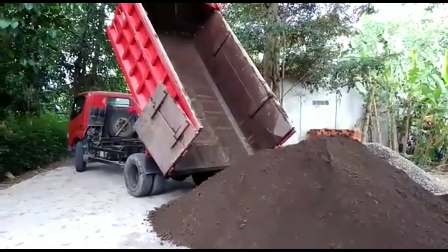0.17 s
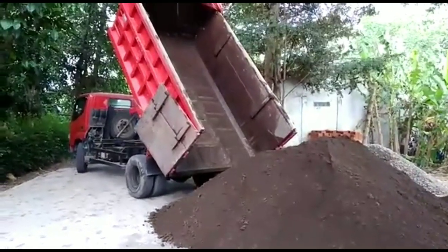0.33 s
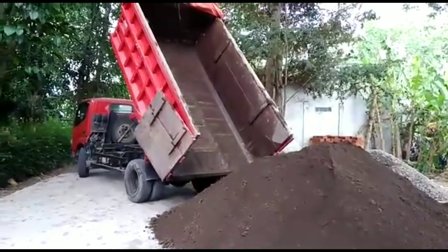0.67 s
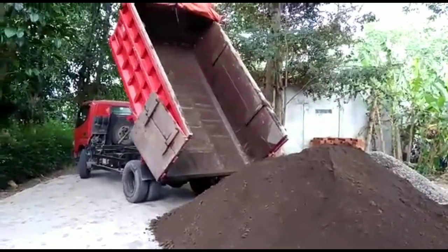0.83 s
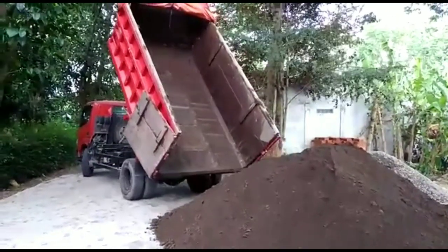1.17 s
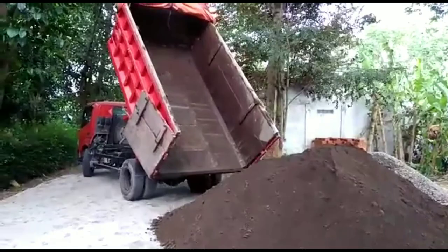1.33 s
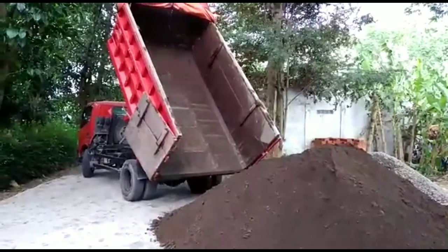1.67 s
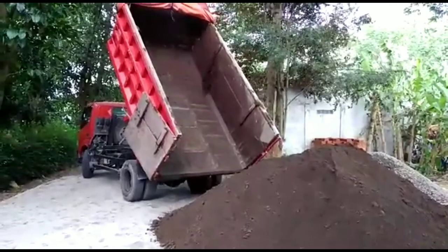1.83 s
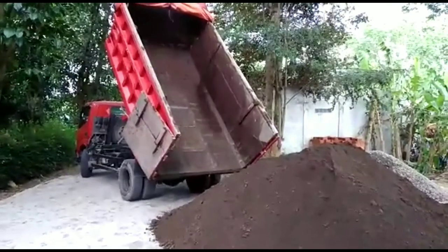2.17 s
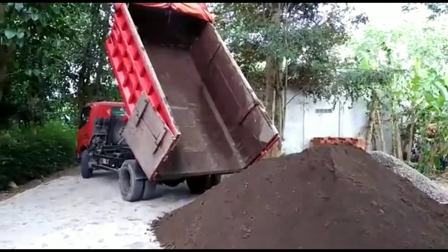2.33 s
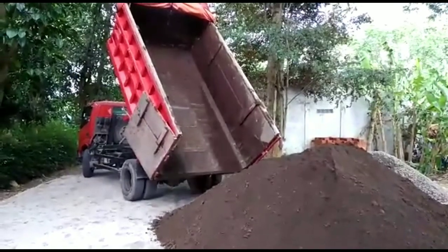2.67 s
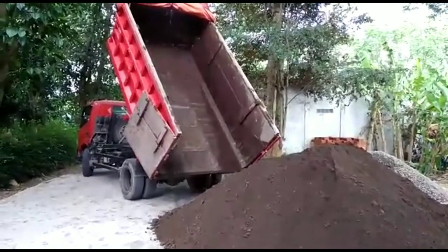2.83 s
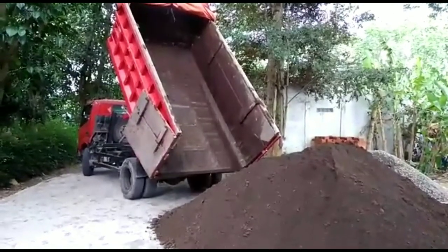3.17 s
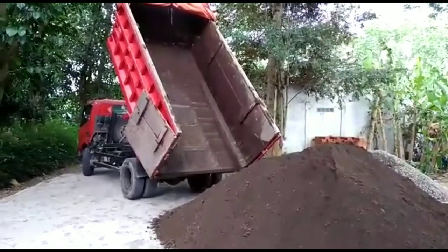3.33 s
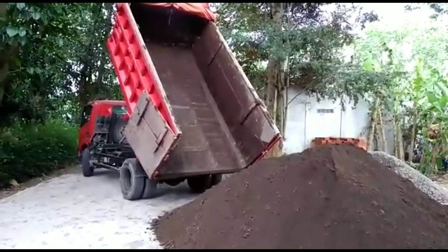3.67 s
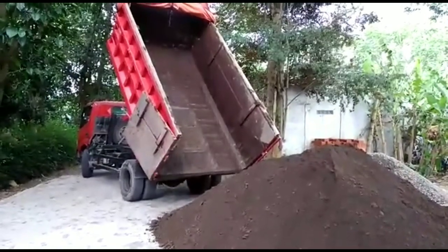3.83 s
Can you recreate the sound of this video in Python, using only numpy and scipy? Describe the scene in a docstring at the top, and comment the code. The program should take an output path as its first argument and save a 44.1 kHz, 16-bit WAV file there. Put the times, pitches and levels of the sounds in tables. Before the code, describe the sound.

In an open yard, a diesel idles with uneven puffs and soft scuffs; small clinks lead to a burst of tailgate bangs and sliding grit, then a few clinks and low wind thumps on the microphone.

```python
"""A tipper truck with its bed raised creeps away from a heap of sand in a yard, over a soft hiss.
From the start its diesel thuds at idle, as uneven puffs ringing an exhaust pipe; the chassis scuffs, wind puffs.
The latch clinks, sand hisses off the bed, and the loose tailgate bangs, judders against the bed and bangs again,
as noise bursts and ringing modes, while the bed thuds and groans. Last clinks follow, then hard puffs of wind
rumble and thump on the microphone."""
import sys
import numpy as np
from scipy import signal
from scipy.fft import rfft, irfft
from scipy.io import wavfile
from scipy.ndimage import uniform_filter1d

SR = 44100
rng = np.random.default_rng(int(sys.argv[2]) if len(sys.argv) > 2 else 0)


def bounce(signal):
    """Save signal as a 16-bit WAV file at the path given by the first command-line argument."""
    frames = np.transpose(np.atleast_2d(signal))
    limited = np.clip(frames, -1, 1)
    pcm = np.round(limited * 32767).astype(np.int16)
    wavfile.write(sys.argv[1], SR, pcm)


N = 176400
TIME = np.arange(N) / SR

# All colour tables below set noise spectra. Each row: frequency in Hz, relative density in dB per Hz.

# Blows of the tailgate. Each row: start in seconds, steel clank in dB, bed panel boom in dB,
# contact length in seconds.
TAILGATE_BLOWS = [(2.1647, -17, -26, 0.0027), (2.276, -34, -39, .004), (2.301, -29, -28.5, 0.0056),
                  (2.333, -36.5, -30, .025), (2.372, -34, -49, 0.0063), (2.430, -31.5, -43, 0.0088),
                  (2.459, -35, -37.5, 0.012), (2.551, -29, -44.5, .008), (2.579, -27.5, -37.5, 0.0053),
                  (2.5922, -16, -58, .005), (2.609, -27, -34, 0.0065), (2.717, -40, -51.5, .004),
                  (2.824, -38, -44, 0.0027)]
# Colours of the gate's clank and of the bed's boom.
CLANK_COLOUR = [(300, -42), (900, -7), (1500, -5.5), (2000, 0), (3000, 2.5), (4400, 6), (5300, -0.5),
                (6100, 3.5), (6900, 2.5), (7700, -5), (8800, -8), (9300, -18.5), (11000, -19), (14000, -59)]
BOOM_COLOUR = [(120, -18), (220, -2), (300, 6), (380, -7.5), (560, 6), (760, -3.5), (1000, -0.5),
               (1500, -4.5), (2500, -3), (5000, -32)]
# Ringing of the gate and of the bed panels. Each row: frequency in Hz, relative level in dB, t60 in seconds.
GATE_MODES = [(1614, -6, .3), (1850, -4, .22), (2161, -3, .28), (2468, -2, .26), (3087, -2, .28),
              (3293, -3, .28), (3862, -4, .24), (4250, 0, .2), (4515, -2, .25), (4716, 1, .25),
              (5773, -1, .28), (6115, -5, .22), (6545, -6, .22), (6960, -3, .2)]
PANEL_MODES = [(302, 0, .28), (491, -1, .55), (530, -7, .6), (589, -3, .42), (658, -4, .4), (790, -9, .4),
               (932, -3, .27), (1066, -8, .3), (1150, -6, .2), (1384, -6, .3)]
GATE_RING_DB, PANEL_RING_DB = -15, -6.5
CLANK_T60_S, BOOM_T60_S, CRACK_T60_S = .2, .29, .052
CRACK_DB = .5  # crack over clank at the hardest blow
CHATTER_DB, CHATTER_PER_S = 2.2, 260
YARD_DB, YARD_T60_S = -10.5, .51  # tail of the yard, relative to the hit

# Heavy thuds of the bed on its frame. Each row: start in seconds, level in dB, contact length in seconds.
BED_THUDS = [(2.302, -33.5, 0.013), (2.34, -37, 0.034), (2.42, -37.5, 0.014)]
THUD_COLOUR = [(150, -27), (250, -1), (305, 3), (360, -6), (420, 5), (520, -4), (900, -29)]
THUD_T60_S = .14

# The bed groans as the load shifts. Each row: time in seconds, pitch in Hz, level in dB.
BED_GROAN = [(2.28, 480, -62), (2.379, 500, -40), (2.451, 540, -29.5), (2.519, 565, -37.5),
             (2.621, 625, -41), (2.72, 610, -46), (2.821, 535, -40), (2.92, 510, -67), (3.3, 520, -72)]
GROAN_TURNS_PER_S = 190

# Light clinks of latch and chain. Each row: start in seconds, level in dB, leading pitch in Hz.
LATCH_CLINKS = [(1.5685, -38.5, 6930), (1.598, -30.5, 5940), (1.607, -30.5, 3426), (1.665, -34.5, 5850),
                (2.0124, -43.5, 3720), (2.0498, -40.5, 6230), (2.938, -38, 4150), (2.958, -44, 3900),
                (3.0516, -42.5, 7280)]
CLINK_COLOUR = [(800, -14), (2000, -10.5), (2800, -2.5), (3500, 3.5), (4300, 1.5), (5200, 1.5), (5900, 3),
                (7000, 3.5), (8200, -4), (10000, -9), (14000, -21)]
CLINK_T60_S, CLINK_YARD_DB = .11, -5.5
CLINK_RING_DB, CLINK_RING_T60_S = 3, .09
# The latch's own ringing. Each row: frequency in Hz, relative level in dB, t60 in seconds.
LATCH_MODES = [(3295, -14, .2), (3490, -8, .2), (4850, -16, .15), (5826, -7, .16), (5960, -10, .16),
               (6850, -11, .16)]
LATCH_RING_DB = -9

# Sand and grit sliding on the steel. Each row: time in seconds, level in dB.
SAND_LEVEL = [(0, -65), (1.93, -55), (2.07, -39.5), (2.14, -46), (2.3, -35), (2.47, -36), (2.65, -38),
              (2.8, -40.5), (3.08, -46), (3.25, -52.5), (4, -71)]
SAND_COLOUR = [(200, -19), (400, -3), (560, 12), (850, 6), (1600, 0.5), (3800, -1), (5300, -5.5),
               (7200, 3.5), (9500, -6.5), (14000, -19.5)]

FIRST_CYCLE_S, CYCLE_S, SLOWING_S_PER_CYCLE = .0943, .1002, .00002
# Uneven firings of one engine cycle. Each row: delay in seconds, level in dB, pulse cut-off in Hz.
FIRINGS = [(-.0275, 4, 100), (0, 2, 505), (.021, 1, 400), (0.047, -12.5, 110)]
FIRING_ROUGH_DB = .8
# Echoes of the exhaust from ground, chassis and walls. Each row: delay in seconds, level in dB.
EXHAUST_ECHOES = [(.0054, -6.5), (0.011, -19.5), (0.0178, -8), (0.034, -14.5)]
# Exhaust pipe resonances. Each row: frequency in Hz, level in dB before division by frequency, t60 in seconds.
PIPE_MODES = [(49, -9.5, 0.43), (120, -9, 0.12), (207, -3.5, 0.08), (253.3, -0.5, 0.095), (296, -15, 0.043),
              (393, -7, 0.064), (484, -1, 0.09), (590, -15, 0.17), (740, -22, 0.093), (866, -53, 0.059)]
DIRECT_PUFF_DB = -14.5  # relative to the pipe
# Exhaust loudness at the microphone. Each row: time in seconds, level in dB.
EXHAUST_LEVEL = [(0, -41.5), (.8, -43.5), (1.6, -42.5), (2.4, -45), (3.2, -44), (3.6, -49), (4, -44)]
# Mechanical clatter of the engine: its colour, then its loudness.
CLATTER_COLOUR = [(150, 20), (400, 1), (900, 2), (1300, -2.5), (1700, -9), (2100, -12), (2500, -4.5),
                  (3100, -5.5), (3900, -12), (6000, -13.5), (14000, -30)]
# Each row: time in seconds, level in dB.
CLATTER_LEVEL = [(0, -43.5), (.7, -43), (.9, -39.5), (1.1, -42.5), (1.9, -46.5), (3, -52), (3.5, -49.5),
                 (4, -47)]
CLATTER_DELAY_S, CLATTER_SWING_DB = .049, 3

# Soft scuffs of the creeping truck. Each row: start in seconds, level in dB, length in seconds.
CHASSIS_SCUFFS = [(.04, -52, .03), (.15, -49.5, 0.017), (.36, -51, 0.022), (.46, -51, .02),
                  (.55, -52, 0.046), (.65, -48, 0.011), (.70, -50, 0.0095), (.845, -44.5, 0.025),
                  (1.448, -50.5, 0.031), (1.548, -44, 0.016), (1.951, -48.5, 0.024)]
SCUFF_COLOUR = [(400, -16), (800, 6.5), (1200, 5), (1700, -12), (2200, -10), (2700, 4.5), (3200, 3.5),
                (3800, -8), (7000, -20), (14000, -16)]
SCUFF_T60_S = .23

# Hard buffets of wind on the microphone. Each row: start in seconds, level in dB, length in seconds.
WIND_BUFFETS = [(3.413, -40, 0.015), (3.823, -29, 0.0255)]
BUFFET_COLOUR = [(50, -2), (100, 3), (200, -3), (320, -4), (450, -20), (1500, -51)]
BUFFET_T60_S = .044
# Wind on the microphone. Each row: time in seconds, level in dB.
WIND_LEVEL = [(0, -43), (.68, -44), (.75, -30.5), (.82, -40.5), (.97, -30), (1.15, -45), (1.7, -48.5),
              (1.78, -38), (1.9, -43.5), (2.7, -55), (2.86, -32.5), (3.2, -42), (3.3, -43), (3.43, -25),
              (3.53, -46), (3.59, -32), (3.79, -35.5), (3.83, -25.5), (3.88, -40), (3.94, -28.5),
              (4, -43.5)]
RUMBLE_COLOUR = [(20, -27), (35, 1), (50, -9), (70, 2), (110, -6.5), (160, -14), (280, -23), (450, -49),
                 (1500, -76)]
WIND_LUMP_DB = 2.4
# Hiss of the yard.
HISS_COLOUR = [(100, 19), (500, 5), (1500, -8.5), (4000, -8), (5600, -7.5), (6900, 4), (7600, 2.5),
               (8600, -2.5), (10500, -6.5), (12500, -13), (14200, -12.5)]
HISS_DB, HISS_FLUTTER_DB = -47.5, .7

RIPPLE_DB, RIPPLE_HZ = 3.0, 45  # depth and spacing of the steel's spectral peaks
CUTOFF_HZ = 14450


def from_db(db):
    """Decibels to gain."""
    return 10 ** (np.asarray(db) / 20)


def rms_one(x):
    """Scale to unit rms."""
    return x / np.sqrt(np.mean(x ** 2) + 1e-20)


def level(rows):
    """Gain over time, drawn straight in dB between the rows."""
    return from_db(np.interp(TIME, *np.transpose(rows)))


def noise(colour):
    """Unit noise shaped to a colour, falling away below its lowest row."""
    hz, db = np.transpose(colour)
    bins = np.maximum(np.arange(N // 2 + 1) * SR / N, 1)
    gain = from_db(np.interp(np.log(bins), np.log(hz), db))
    gain = gain * np.minimum(bins / hz[0], 1) ** 2
    return rms_one(irfft(rfft(rng.standard_normal(N)) * gain, N))


def steel(colour):
    """Coloured noise with the close, narrow peaks of a large steel structure."""
    bins = np.arange(N // 2 + 1) * SR / N
    peaks = np.interp(bins / RIPPLE_HZ, np.arange(N), rng.standard_normal(N))
    return rms_one(irfft(rfft(noise(colour)) * from_db(RIPPLE_DB * peaks), N))


def flutter(rate):
    """Random wander of unit rms, with a new target `rate` times a second."""
    return rms_one(np.interp(TIME * rate, np.arange(N), rng.standard_normal(N)))


def ring(clicks, hz, t60):
    """A two-pole resonator: a unit click sets a sine of height 1 ringing and dying."""
    radius = from_db(-60 / (t60 * SR))
    angle = 2 * np.pi * hz / SR
    feedback = [1, -2 * radius * np.cos(angle), radius * radius]
    return signal.lfilter([0, np.sin(angle)], feedback, clicks + 1e-18)


def clicks_at(times, sizes):
    """A track of single clicks."""
    places = np.clip(np.asarray(times) * SR, 0, N).astype(int)
    return np.bincount(places, sizes, N + 1)[:N]


def dying(start, hold, t60):
    """Envelope: sudden start, short hold, exponential fall."""
    return (TIME >= start) * from_db(-60 * np.maximum(TIME - start - hold, 0) / t60)


def wash(hits, colour, t60, yard_db):
    """Countless close steel modes, as noise, die after each hit and leave the yard's tail."""
    power = 0
    for start, db, hold in hits:
        near = dying(start, hold, t60)
        yard = from_db(yard_db) * dying(start, hold, YARD_T60_S)
        power = power + from_db(db) ** 2 * (near ** 2 + yard ** 2)
    return np.sqrt(power) * steel(colour)


def struck(times, dbs, modes, scatter_db=2):
    """Each blow rings every mode with a strength of its own, starting within one period."""
    total = 0
    for hz, db, t60 in modes:
        starts = times + rng.random(len(times)) / hz
        sizes = from_db(dbs + db + scatter_db * rng.standard_normal(len(times)))
        total = total + ring(clicks_at(starts, sizes), hz, t60)
    return total


def tailgate():
    """The gate clanks against the bed, whose panels boom and ring on; hard blows also crack."""
    times, clank_db, boom_db, contact = np.transpose(TAILGATE_BLOWS)
    chatter = rms_one(from_db(CHATTER_DB * flutter(CHATTER_PER_S)))
    clank = chatter * wash(zip(times, clank_db, contact), CLANK_COLOUR, CLANK_T60_S, YARD_DB)
    # the crack falls off twice as fast in dB as the clank, so soft blows barely have one
    crack_db = CRACK_DB + 2 * clank_db - clank_db.max()
    crack_shape = sum(from_db(db) * dying(start, hold, CRACK_T60_S)
                      for start, db, hold in zip(times, crack_db, contact))
    crack = noise(CLANK_COLOUR) * crack_shape
    boom = wash(zip(times, boom_db, contact), BOOM_COLOUR, BOOM_T60_S, YARD_DB)
    gate_ring = struck(times, clank_db + GATE_RING_DB, GATE_MODES)
    panel_ring = struck(times, boom_db + PANEL_RING_DB, PANEL_MODES)
    return crack + clank + boom + gate_ring + panel_ring


def thuds():
    """The bed drops its weight onto the frame with a low, hollow burst of steel noise."""
    return wash(BED_THUDS, THUD_COLOUR, THUD_T60_S, YARD_DB)


def groan():
    """A rough panel resonance that rises and sinks: a gliding tone blurred by random wander."""
    times, hz, db = np.transpose(BED_GROAN)
    phase = 2 * np.pi * np.cumsum(np.interp(TIME, times, hz)) / SR
    rough = flutter(GROAN_TURNS_PER_S) * np.cos(phase) + flutter(GROAN_TURNS_PER_S) * np.sin(phase)
    return from_db(np.interp(TIME, times, db)) * rough


def latch():
    """Small steel parts clink, each with one brief leading note over the ring of the latch."""
    times, dbs, _ = np.transpose(LATCH_CLINKS)
    notes = sum(ring(clicks_at([start], [from_db(db + CLINK_RING_DB)]), hz, CLINK_RING_T60_S)
                for start, db, hz in LATCH_CLINKS)
    latch_ring = struck(times, dbs + LATCH_RING_DB, LATCH_MODES)
    hits = [(start, db, 0) for start, db, _ in LATCH_CLINKS]
    return notes + latch_ring + wash(hits, CLINK_COLOUR, CLINK_T60_S, CLINK_YARD_DB)


def sand():
    """Shaken loose, grit slides down the hollow bed: noise coloured by the steel."""
    return level(SAND_LEVEL) * steel(SAND_COLOUR)


def exhaust(cycles):
    """Uneven firings puff, echo and ring the exhaust pipe."""
    puffs = 0
    for delay, db, cut_hz in FIRINGS:
        times = cycles + delay
        sizes = from_db(db + FIRING_ROUGH_DB * rng.standard_normal(len(cycles))) * (times > 0)
        soften = signal.butter(2, cut_hz, fs=SR, output="sos")
        puffs = puffs - signal.sosfilt(soften, clicks_at(times, sizes))
    echoes = sum(from_db(db) * np.interp(TIME - delay, TIME, puffs, left=0)
                 for delay, db in EXHAUST_ECHOES)
    puffs = puffs + echoes
    push = np.gradient(puffs)
    pipe = rms_one(sum(ring(push, hz, t60) * from_db(db) / hz for hz, db, t60 in PIPE_MODES))
    direct = rms_one(signal.sosfilt(signal.butter(2, 55, "high", fs=SR, output="sos"), puffs))
    return rms_one(pipe + from_db(DIRECT_PUFF_DB) * direct)


def clatter(cycles, count):
    """Engine clatter jumps up once a cycle, then sinks, with a fast random flutter."""
    turn = np.interp(TIME - CLATTER_DELAY_S, cycles, count) % 1
    swing_db = -CLATTER_SWING_DB * turn + 1.47 * flutter(150)
    return rms_one(steel(CLATTER_COLOUR) * from_db(swing_db))


def engine():
    """One slightly slowing run of engine cycles drives both exhaust and clatter."""
    count = np.arange(-1, 41)
    cycles = FIRST_CYCLE_S + CYCLE_S * count + SLOWING_S_PER_CYCLE * count ** 2 / 2
    return level(EXHAUST_LEVEL) * exhaust(cycles) + level(CLATTER_LEVEL) * clatter(cycles, count)


def scuffs():
    """Short, soft rubbing noises from the chassis."""
    return wash(CHASSIS_SCUFFS, SCUFF_COLOUR, SCUFF_T60_S, YARD_DB)


def buffets():
    """The hardest puffs of wind thump on the microphone: low noise bursts with softened edges."""
    shape = sum(from_db(db) * dying(start, hold, BUFFET_T60_S) for start, db, hold in WIND_BUFFETS)
    return noise(BUFFET_COLOUR) * uniform_filter1d(shape, size=400)  # about 9 ms


def wind():
    """Turbulence rumbles on the microphone as lumpy low noise."""
    lumps = from_db(WIND_LUMP_DB * flutter(30))
    return level(WIND_LEVEL) * rms_one(noise(RUMBLE_COLOUR) * lumps)


def yard_hiss():
    """Background noise of the yard, with a slight flutter."""
    return from_db(HISS_DB + HISS_FLUTTER_DB * flutter(17)) * noise(HISS_COLOUR)


def scene():
    """All sources at one microphone."""
    truck = tailgate() + thuds() + groan() + latch() + sand() + engine() + scuffs()
    return (truck + buffets() + wind() + yard_hiss())[None]


def record(dry):
    """The deepest bass and the top are cut."""
    dry = signal.sosfilt(signal.butter(6, 37, "high", fs=SR, output="sos"), dry)
    return signal.sosfilt(signal.ellip(10, .2, 80, CUTOFF_HZ, fs=SR, output="sos"), dry)


dry = scene()
out = record(dry)
bounce(out)
```